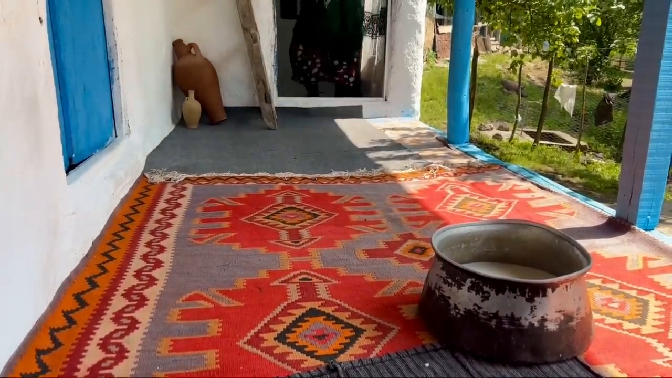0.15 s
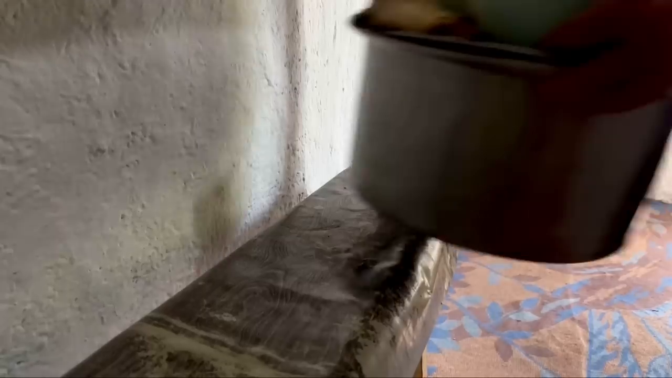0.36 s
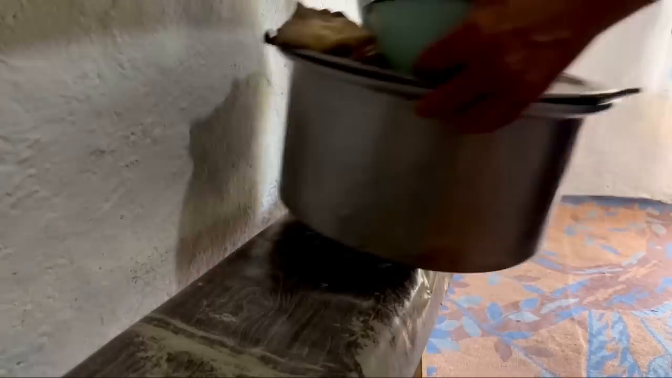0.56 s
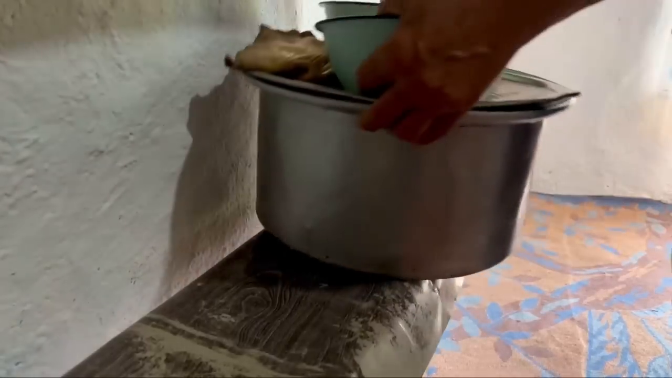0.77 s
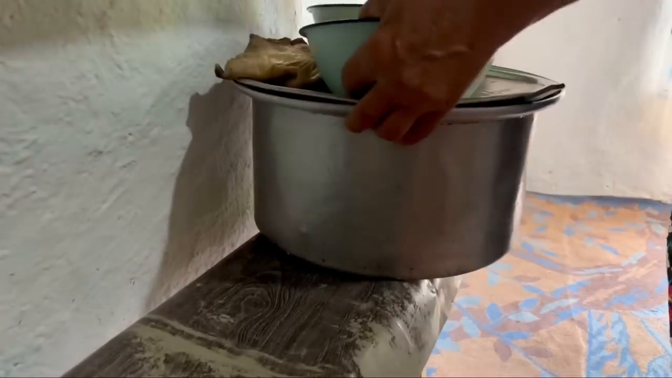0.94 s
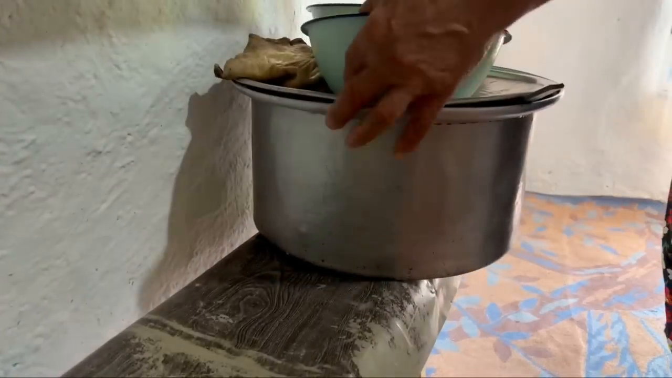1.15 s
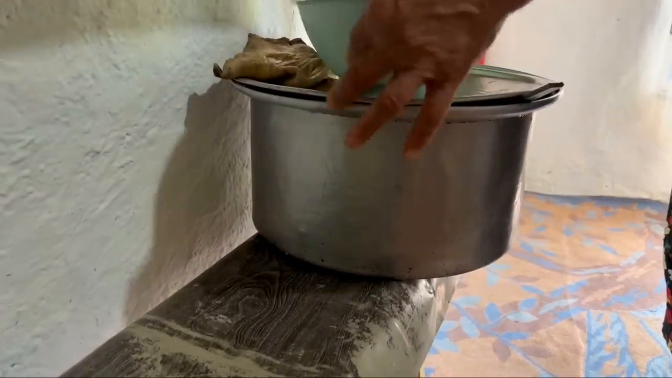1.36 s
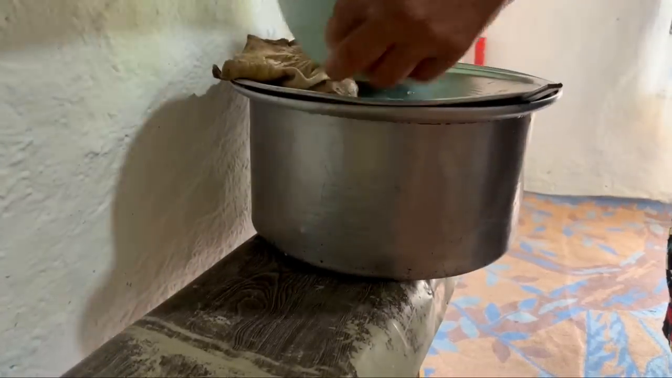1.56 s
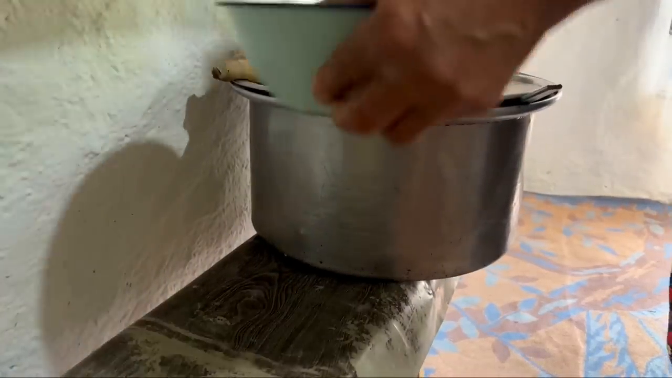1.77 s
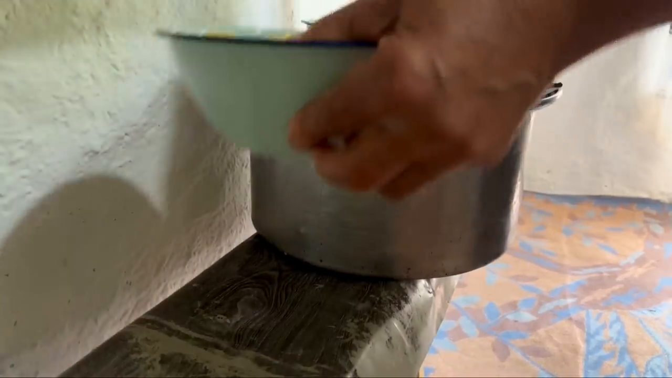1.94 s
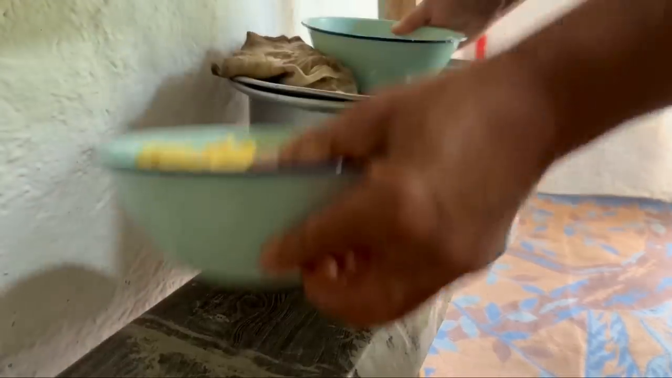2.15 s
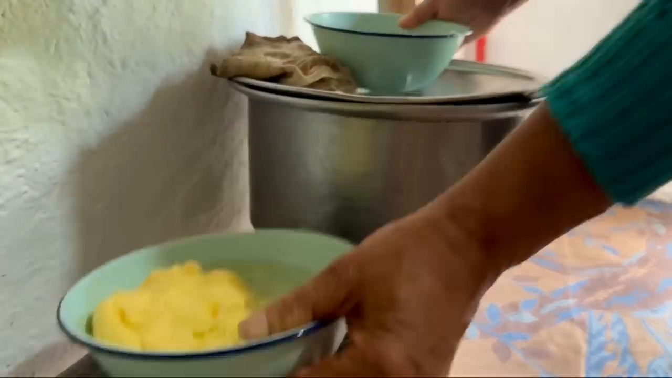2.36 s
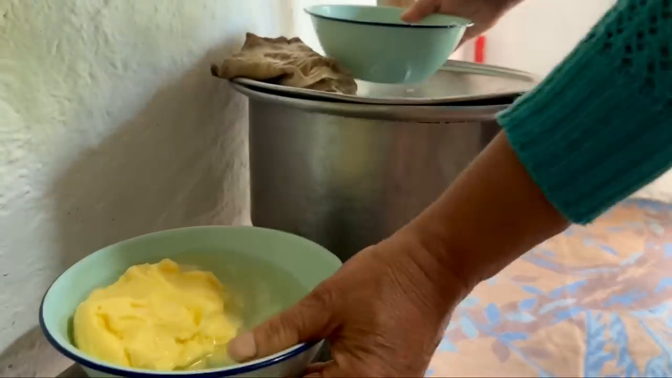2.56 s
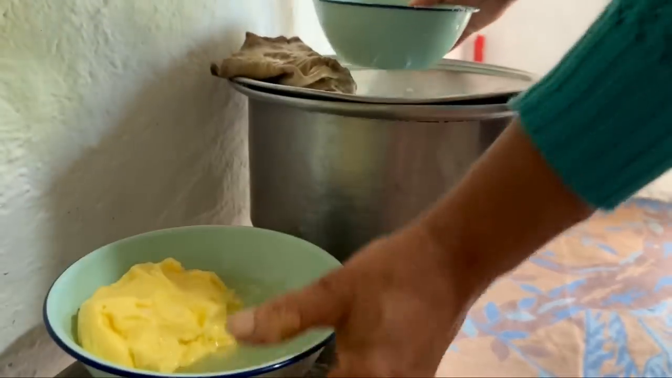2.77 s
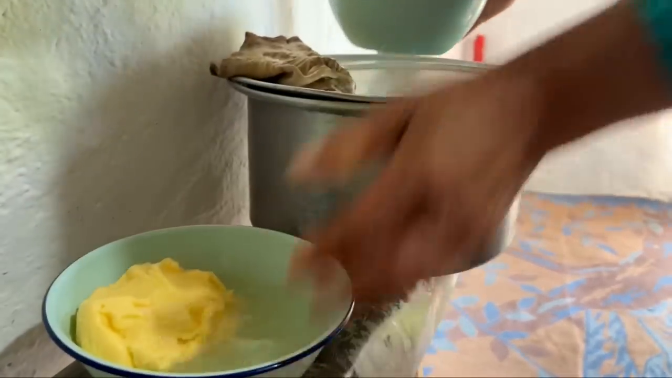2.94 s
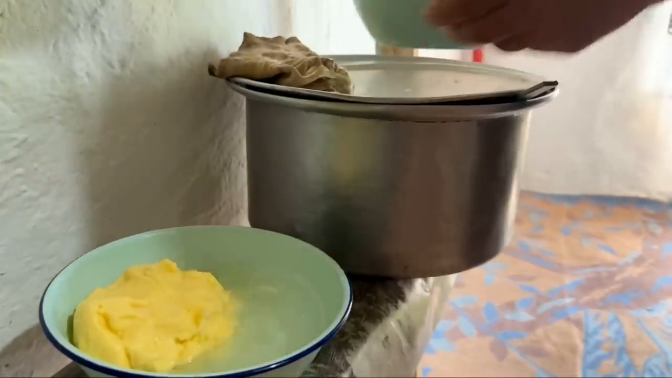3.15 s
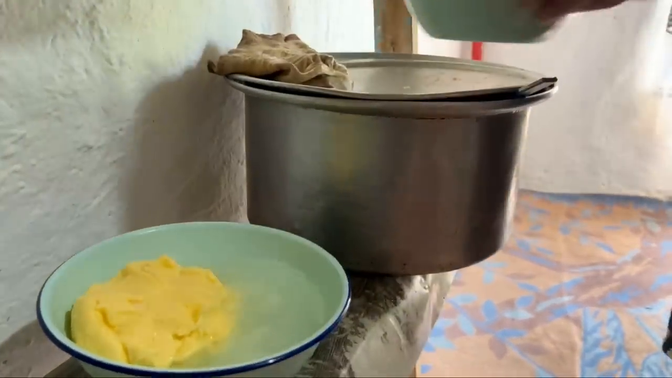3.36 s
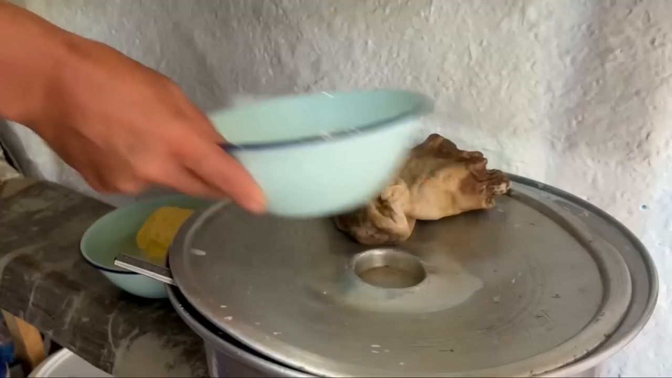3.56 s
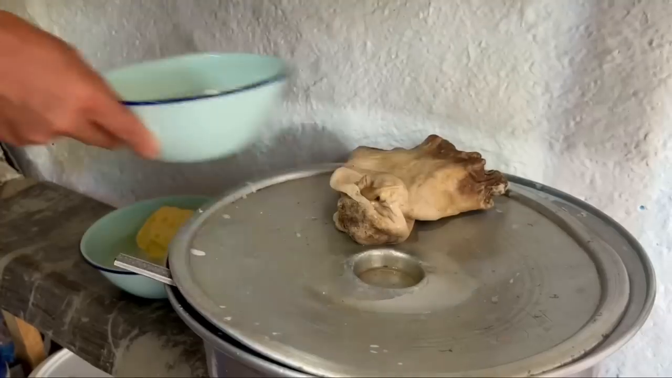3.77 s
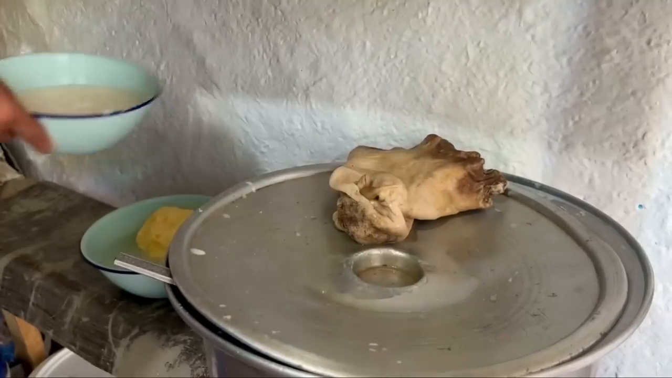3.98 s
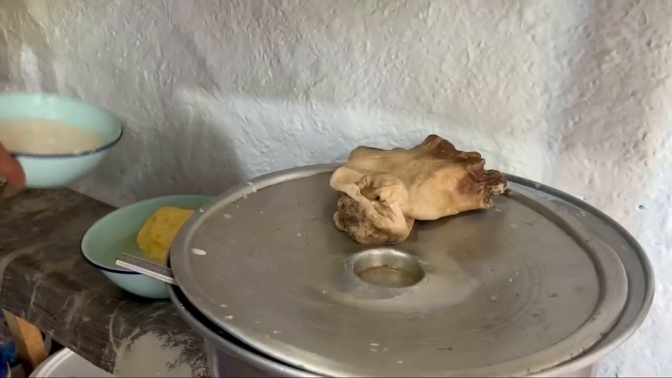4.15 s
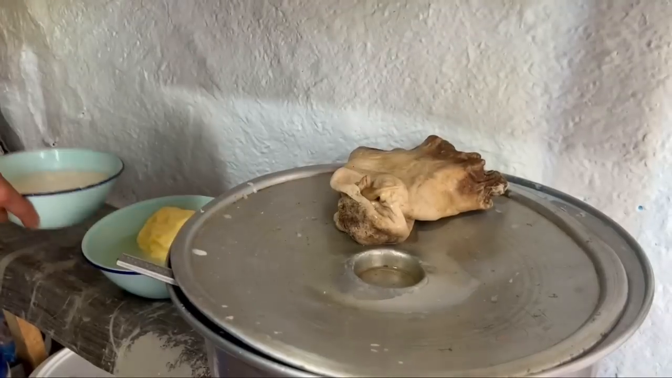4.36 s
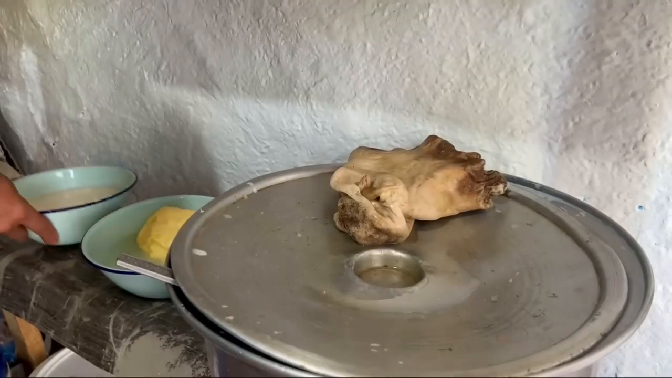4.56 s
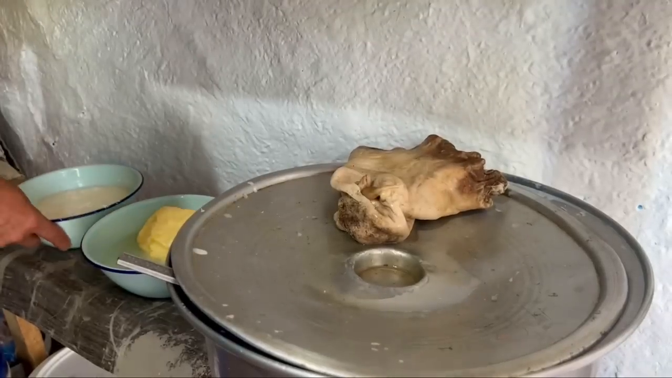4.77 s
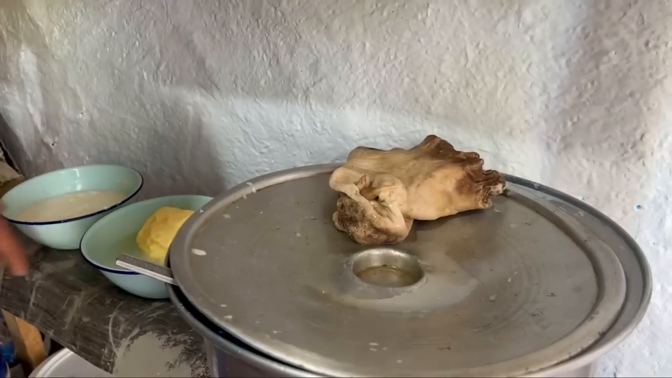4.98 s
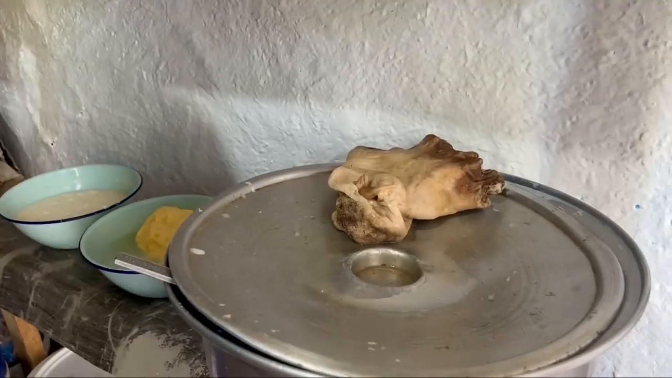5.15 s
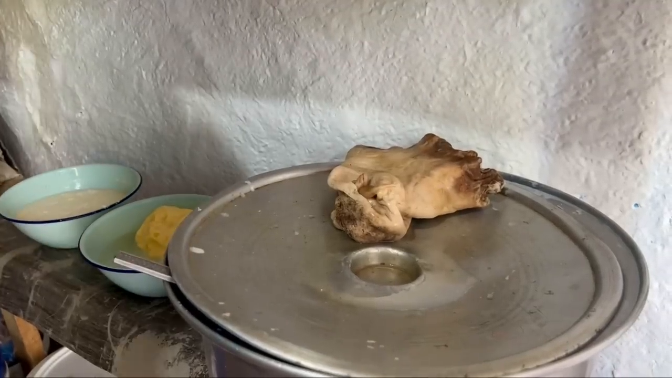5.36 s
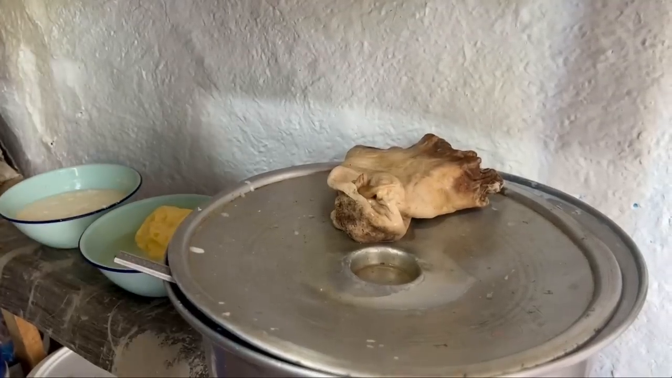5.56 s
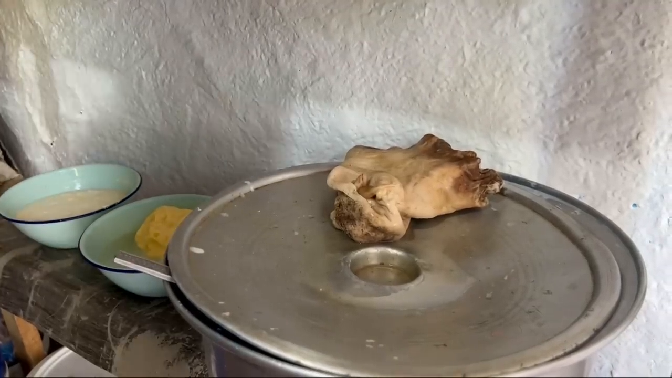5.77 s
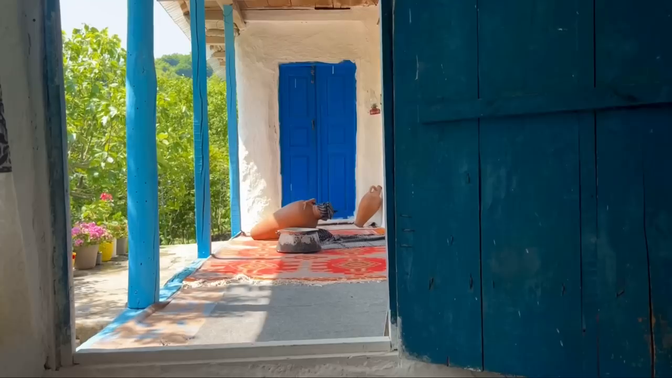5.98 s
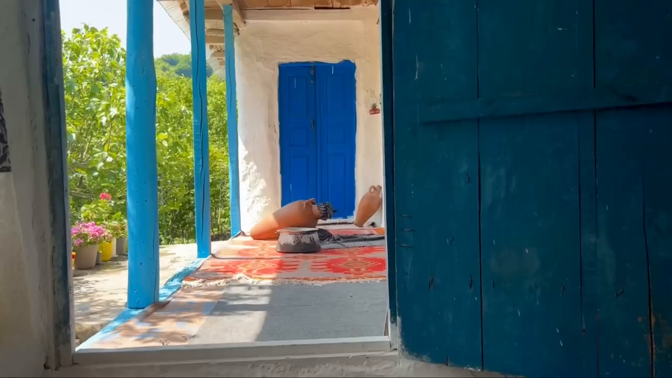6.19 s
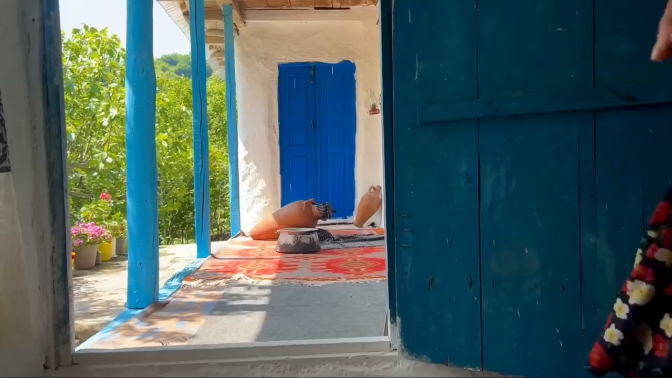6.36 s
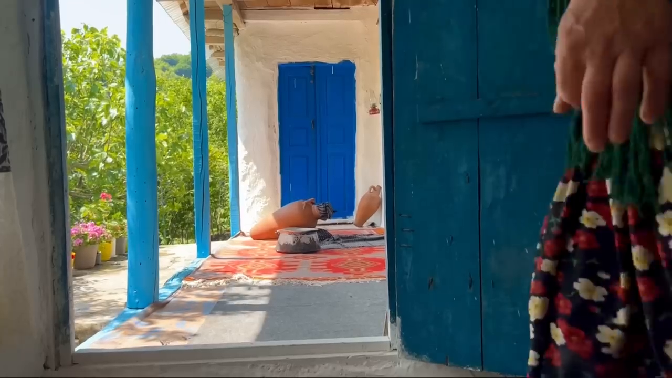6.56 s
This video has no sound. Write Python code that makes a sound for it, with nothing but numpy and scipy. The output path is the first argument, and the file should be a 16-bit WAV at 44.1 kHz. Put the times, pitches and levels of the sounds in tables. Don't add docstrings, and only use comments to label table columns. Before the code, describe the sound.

In a small plastered room, a pot thumps down, enamel clatters loudly on a metal lid, bowls are set on wood, and a low floor hum follows.

```python
import sys
import numpy as np
from scipy import signal
from scipy.fft import rfft, irfft, next_fast_len
from scipy.io import wavfile
from scipy.ndimage import uniform_filter1d

SR = 44100
rng = np.random.default_rng(int(sys.argv[2]) if len(sys.argv) > 2 else 0)


def volts_from_db(level):
    exponent = np.asarray(level, float) / 20
    return 10 ** exponent


def digitize_waveform(pressure):
    field = np.atleast_2d(pressure).T
    bounded = np.clip(field, -1, 1)
    quanta = np.round(bounded * 32767).astype(np.int16)
    wavfile.write(sys.argv[1], SR, quanta)


N = 291936


def unit(x):
    return x / np.sqrt(np.mean(x ** 2, axis=-1, keepdims=True) + 1e-30)


def band(x, lo, hi):
    return signal.sosfilt(signal.butter(3, [lo, hi], "band", fs=SR, output="sos"), x)


def walk(rate):
    k = int(SR / rate)
    steps = np.repeat(rng.standard_normal(N // k + 1), k)
    return unit(uniform_filter1d(uniform_filter1d(steps, k), k)[:N])


def pair(size, alike):
    mid, side = rng.standard_normal((2, size))
    alike = np.clip(alike, 0, 1)
    return np.sqrt((1 + alike) / 2) * mid + np.sqrt((1 - alike) / 2) * side * np.array([[1], [-1]])


# (time [s], knock peak [dB], thud over knock [dB], rattle over knock [dB])
POT_HITS = [(0.71, -41, -2, 4.5), (0.748, -47.5, 7, -20), (0.799, -41, -2.5, -18), (0.845, -24, 9, -8.5),
            (0.883, -32.5, 2.5, -11.5), (1.016, -44, -9, -7), (1.03, -53, -6.5, 4), (1.043, -48, 1, -2.5),
            (1.058, -52, -1.5, -4), (1.084, -52, -0.5, -19.5), (1.108, -49.5, 2.5, -27),
            (1.152, -55, 4.5, -19.5)]
CLINK_HITS = [
    (1.353, -11, -8, -2),
    (1.363, -20, 3.5, -8.5),
]
LID_HITS = [
    (1.69, -12, 3, 0),
    (1.753, -20.5, 0.5, -17),
    (1.704, -15, 2.5, -5.5),
    (1.72, -16, 1.5, -8),
    (1.78, -29.5, 0.5, -6),
    (1.812, -28, -1, -14),
    (1.999, -57.5, -16.5, -30),
]
BOWL_HITS = [
    (2.386, -37.5, -6, -8.5),
    (2.397, -13, 3, -21.5),
    (2.410, -33, 10.5, 0),
    (2.424, -27, -20, -4),
    (2.441, -35, 14, 6),
    (2.462, -33, 6, -9),
]
ROCK_HITS = [
    (2.625, -49.5, 5, -2),
    (2.635, -40, 21, -10),
    (2.645, -33, 2, -1.5),
    (2.667, -35, 5.5, -5),
]
TICK_HITS = [
    (3.223, -55, -9, 7.7),
    (3.276, -58.5, 7, 11.8),
    (3.421, -37, -21, 7.5),
]
LAST_HITS = [
    (4.575, -62, -8, -14),
    (4.612, -26, 6.5, -16),
    (4.619, -24.5, 9, -3),
    (4.742, -54, 17, -8),
    (4.80, -63, 16, -6),
]
SCUFFS = [(0.257, -65, 1, -13), (0.453, -63, -4, 6), (2.929, -61.5, -16, -13.5), (3.267, -54, -20, -1.5),
          (3.319, -63, 3.5, -17), (3.513, -55, -4.5, -11.5), (4.934, -59, -2, -18.5), (5.049, -66, 5, -9)]
TOUCH_HITS = [(1.24, -62, 17.5, 2.5), (1.264, -60, -2.5, -5.5), (1.281, -45, -26.5, -6),
              (1.299, -50, -7, 1), (1.577, -60, 5.5, 9.5)]
SLIDE_HITS = [(4.308, -52.5, -14, 5), (4.322, -42, -11.5, -12.5), (4.35, -47.5, -3, -22),
              (4.43, -52, -1.5, -15.5)]
STEP_HITS = [(2.267, -54, -5, -12), (3.024, -55, -5, -12.5), (3.677, -54, -3, -15), (5.804, -58, -6, -12)]
SNAP_HITS = [(2.767, -39.5, -12, 2.9), (2.772, -40, 1.5, 1.1), (2.795, -47, -11, 1.5),
             (2.802, -48, -6, 5.2)]
# (frequency [Hz], level [dB], t60 [s])
STEP = [(125, 5, .12), (261.3, 2, 0.052), (415.3, -7.5, 0.075), (910.5, -16, .004), (1900, -22, 0.0069),
        (4200, -14.5, .005)]
TOUCH = [(290, -0.5, .08), (680, 2, 0.098), (1521, -7.5, 0.054), (5030, -12, .005), (5502, -13.5, 0.0045),
         (7900, -14.5, 0.012)]
SLIDE = [(202, -4, 0.17), (289.6, 8, 0.08), (396, -7, 0.12), (670, -18.5, 0.065), (4734, -37.5, .03)]
POT = [(120.7, -11.5, 0.24), (150.3, -9, 0.35), (195.2, -7, 0.19), (260.7, 1, 0.06), (332.6, -10.5, 0.064),
       (448, -18, 0.036), (670, -15, 0.096), (1218, -31.5, 0.052), (1510, -29, .06), (2230, -54, 0.071),
       (4425, -33, 0.033), (4858, -26, .05)]
CLINK = [(113.07, -8, 0.1), (181, 0, 0.083), (336, -10, 0.036), (423, -2, 0.097), (520, 0, .06),
         (683, -3.5, 0.077), (798, -6, 0.17), (1044, -8, 0.056), (1460, -4, 0.035), (1930, -10.5, 0.026),
         (2410, -10.5, 0.043), (4900, -17, 0.012), (5250, -4.5, .015), (5637, -10.5, .015),
         (7700, -10.5, 0.0099), (8490, -9.5, .012)]
LID = [(111, -9, 0.22), (181, 3, 0.12), (258, -1.5, 0.066), (344, 0, 0.048), (426, -1, 0.12),
       (502, -11.5, 0.2), (687, -14.5, 0.3), (803.2, -11, 0.19), (1090, -13, 0.038), (1510, -16, .12),
       (2100, -23, .03), (2400, -23.5, 0.02), (3380, -25.5, 0.0091), (5500, -27, 0.0096),
       (7350, -23.5, .012)]
BOWL = [(85.7, -5, .25), (196.4, -1.5, 0.088), (243, -12.5, 0.063), (306, -1.5, 0.091),
        (407.4, -1.5, 0.054), (453, 7, 0.0084), (631, -12, 0.039), (808, -14, 0.071), (988, -11.5, 0.023),
        (1230, -8, 0.044), (1490, -15, 0.025), (1950, -16, 0.03), (6800, -36, 0.0061)]
ROCK = [(101, -11, .2), (220.5, -1, 0.059), (277, 5.5, 0.028), (337, 0.5, 0.024), (438, 0.5, 0.045),
        (577, 0, 0.013), (688, -2.5, 0.043), (1065, 1, 0.04), (1380, -26, .04), (2440, -12.5, 0.025),
        (3990, -22, 0.006), (5800, -22, 0.006)]
TICK = [(246, -13, 0.041), (400, -13, 0.03), (1763, -3.5, 0.012), (2747, -16, 0.0062), (4990, -3.5, 0.0055),
        (6360, -10, 0.0035), (7760, -2.5, 0.0027)]
LAST = [(118, -38.5, 0.18), (181.4, -6, 0.2), (238.2, -2.5, 0.15), (360, 8, 0.034), (474, -7, 0.07),
        (700, 2, 0.042), (1000, -40, 0.032), (1550, -9.5, 0.0056), (2670, -28, 0.011), (4800, -38, 0.0045)]
FLOOR_BOARD = [(119, 1.5, 0.26), (269, 4, 0.2), (396, -32, 0.042), (907, -10.5, 0.007), (4100, -19, 0.036)]
SNAP = [(240.5, -3.5, 0.022), (424, -12, 0.042), (2270, 8.5, 0.0045), (3360, 3.5, 0.0018),
        (4260, -10, 0.0037)]
# (contacts, modes, push [s], rattle t60 [s], ring over rattle [dB], rattle tilt [dB/octave],
# sizzle over rattle [dB], left minus right [dB])
OBJECTS = [(POT_HITS, POT, 0.0028, 0.09, -8, -6, -8.5, .3),
           (CLINK_HITS, CLINK, 0.0007, 0.12, 3.6, -7.5, 5, .3),
           (LID_HITS, LID, 0.00037, 0.11, -7.5, -4.5, -2.5, .3),
           (BOWL_HITS, BOWL, 0.0016, 0.065, -7, -10.5, -9, 0.94),
           (ROCK_HITS, ROCK, 0.00165, 0.08, -3, -2.5, -8.5, .3),
           (TICK_HITS, TICK, 0.00041, 0.01, -1, -0.82, -22, 1.1),
           (LAST_HITS, LAST, 0.0018, 0.11, -1.1, -9.5, -4, -1.6),
           (SCUFFS, FLOOR_BOARD, 0.0049, 0.26, -27, -2, -2, 0.34),
           (TOUCH_HITS, TOUCH, 0.0064, 0.03, -1.5, -1.8, -18, -.3),
           (SLIDE_HITS, SLIDE, 0.00843, 0.18, -6.5, -7, -9, -.3),
           (SNAP_HITS, SNAP, 0.00036, 0.013, 9.5, -2.2, -22, 0.87),
           (STEP_HITS, STEP, 0.0012, 0.27, -15.5, -7, -11, 0.25)]
# (level sent to the room [dB], floor bump over thud [dB])
PLACES = [(-1, -14), (-6.5, -30), (-2, -19.5), (0, -12.5), (-2, -10.5), (-6, -31), (-2.5, -20), (1, -18.5),
          (1.5, -18.5), (1, -15), (-7, -19), (0.5, -16.5)]
# (low edge [Hz], high edge [Hz])
BANDS = [(60, 500), (500, 3000), (3000, 9800), (9800, 15700)]


def contacts(hits, modes, push_s, rattle_s, ring_db, tilt_db, sizzle_db, pan_db, bump_db):
    size = 10800
    lead_in = 24
    bump_rise_s, bump_t60_s = 0.02, 0.25
    t = np.arange(size) / SR
    hz, db, t60 = np.transpose(modes)[:, :, None]
    t60 = np.minimum(t60, np.minimum(0.17, 0.08 * (1500 / hz) ** 1.4))
    rings = volts_from_db(db) * np.sin(2 * np.pi * hz * t) * 1000 ** (-t / t60)
    s, knock_db, weight_db, edge_db = np.transpose(hits)[:, :, None]
    hiss, jolts, rest = np.moveaxis(rng.standard_normal((len(hits), 3, size)), 1, 0)

    strength = volts_from_db(2.0 * rest[:, :len(modes)]) * np.sign(rest[:, -len(modes):])
    ring = strength @ rings
    grain = volts_from_db(3.0 * np.repeat(rest[:, 100:400], 64, axis=1)[:, :size])
    fall = grain * 1000 ** (-t / rattle_s) * (1 - np.exp(-t / (0.96 * push_s)))
    tilt = volts_from_db(tilt_db * np.log2(np.arange(size // 2 + 1) + 100.))
    rattle = irfft(rfft(hiss) * tilt, size) * fall
    chatter = signal.fftconvolve(ring, jolts * fall ** 4, axes=1)[:, :size]
    pushed = signal.lfilter(np.hanning(int(push_s * SR) + 3), 1, ring)
    bump = band(jolts * (1 - np.exp(-t / bump_rise_s)) * 1000 ** (-t / bump_t60_s), 32, 80)

    thud = volts_from_db(bump_db) * unit(bump) + unit(band(pushed, 110, 680))
    thud = thud + volts_from_db(-8.0) * unit(band(rattle, 100, 500))
    knock, edge = [volts_from_db(ring_db) * unit(band(chatter, *b)) + unit(band(rattle, *b)) for b in BANDS[1:3]]
    sizzle = band(rattle * fall, *BANDS[3])
    sound = 0
    for over_db, part in ((weight_db, thud), (0, knock), (edge_db, edge), (edge_db + sizzle_db, sizzle)):
        sound = sound + volts_from_db(knock_db + over_db) * part / np.abs(part).max(axis=1, keepdims=True)

    beside = early(rest[:, 1024:3584].reshape(len(hits), 2, 1280))
    sound = sound[:, None] + signal.fftconvolve(sound[:, None], beside, axes=2)[:, :, :size]
    pan = volts_from_db(np.array([[pan_db], [-pan_db]]) / 2)
    out = np.zeros((2, N + SR))
    for i, one in zip((s[:, 0] * SR).astype(int) - lead_in, sound):
        heard = t + i / SR < CUTS[np.searchsorted(CUTS, i / SR)]
        out[:, i:i + size] += heard * one * pan
    return out[:, :N]


def early(noise):
    t = np.arange(noise.shape[-1]) / SR
    t60_s = 0.039
    returns = noise * 1000 ** (-t / t60_s) * (t > 0.0008)
    return volts_from_db(-5.5) * unit(band(returns, 586, 8900)) / np.sqrt(len(t))


# (time [s], frequency [Hz], level [dB], rise [s],
# t60 [s])
ENAMEL = [(.711, 284, -32, .004, 0.081), (.749, 278, -40, .003, 0.064), (.802, 296, -35, 0.0026, .06),
          (.848, 256, -17.5, .003, 0.17), (.855, 711, -33, .004, 0.11), (1.356, 439, -21, .003, 0.19),
          (1.357, 534, -20, 0.004, .17), (1.354, 5250, -26, 0.00059, 0.027),
          (1.691, 437, -10.5, .001, 0.09), (1.691, 1180, -19.5, .001, 0.039),
          (1.754, 800, -27.5, .002, .05), (2.398, 1130, -18, 0.00099, .03), (2.44, 667, -30, 0.0039, 0.12),
          (2.636, 666, -34, 0.0021, .06), (2.637, 225, -24, 0.0041, .1), (3.4218, 4900, -45, 0.0004, 0.011),
          (.852, 205, -19, .01, .16), (.87, 150, -25, .02, 0.3), (1.272, 690, -41, .012, 0.2),
          (1.355, 1450, -24, .001, 0.054), (1.357, 1477, -56, .001, 0.41), (1.356, 680, -18.5, .003, 0.15),
          (1.357, 810, -19.5, .003, 0.12), (1.362, 181, -21.5, .015, 0.16), (1.691, 1470, -41, .001, 0.66),
          (1.694, 2392, -28, .004, .15), (1.692, 2780, -48, .001, .3), (1.694, 183, -7.5, .008, 0.16),
          (1.77, 183, -22.5, .012, 0.14), (2.398, 666, -23, .003, 0.056), (2.41, 90, -20, .012, .1),
          (2.41, 183, -20, .01, 0.22), (4.612, 695, -30, .003, 0.1), (4.635, 172.4, -25, .015, 0.28),
          (4.742, 184, -35.5, .01, .15),
          (.85, 113, -27, .015, .3), (.852, 560, -33, .005, .2), (.852, 1174, -38, .003, .15),
              (.85, 1325, -38, .002, .12), (.905, 200, -26, .004, .1), (1.356, 1001, -31, .002, .13),
              (1.357, 1051, -31, .003, .15), (1.358, 1130, -35, .003, .15), (1.356, 7900, -28, .001, .03),
              (1.694, 117, -25, .02, .35), (1.694, 256, -15, .005, .2), (1.695, 530, -22, .004, .2),
              (1.696, 805, -25, .005, .3), (1.694, 1240, -23, .002, .09), (1.696, 1126, -30, .004, .3),
              (1.694, 1570, -26, .002, .15), (1.70, 2800, -29, .006, .13), (1.692, 4400, -24, .0008, .015),
              (1.692, 5600, -24, .0008, .015), (1.753, 330, -19, .003, .07), (2.399, 295, -16, .002, .12),
              (2.40, 389, -24, .004, .25), (2.399, 800, -27, .002, .12), (2.40, 985, -30, .004, .2),
              (2.398, 1450, -26, .001, .05), (2.424, 1700, -31, .001, .03), (2.646, 1061, -42, .004, .2),
              (2.637, 340, -29, .002, .1), (2.638, 480, -33, .003, .1), (1.6915, 300, -13, .001, .04),
              (2.646, 1210, -43, .004, .15), (2.646, 2050, -46, .003, .1), (4.613, 330, -24, .003, .04),
              (4.62, 2650, -38, .001, .04)]


def enamel():
    lag_spread_s = 0.0004
    since = np.arange(int(0.4 * SR)) / SR
    out = np.zeros((2, N + SR))
    rows = ENAMEL
    flutter = volts_from_db(2.5 * walk(70))
    lags = lag_spread_s * rng.standard_normal(len(rows))
    for (s, hz, db, rise_s, t60), lag in zip(rows, lags):
        turn = 2 * np.pi * hz * (since + np.array([[lag], [-lag]]) / 2)
        shake = np.roll(flutter, int(hz * 37))[:len(since)]
        swell = (1 - np.exp(-since / rise_s)) * 1000 ** (-since / t60)
        start = int(s * SR)
        out[:, start:start + len(since)] += volts_from_db(db) * shake * np.sin(turn) * swell
    return out[:, :N]


# (middle [s], spread [s], level [dB])
DRAG = [
    [(5.07, 0.044, -54), (5.45, 0.17, -56), (5.8, 0.041, -57)],
    [(4.97, 0.064, -56), (5.5, 0.34, -59)],
    [(5.02, 0.054, -60), (5.4, 0.36, -68)],
    [(5.1, 0.27, -64.5)],
]
# (frequency [Hz], width [Hz])
DRAG_MODES = [(57, 10), (122, 10), (385, 14), (400, 500)]


def drag():
    t = np.arange(N) / SR
    out = 0
    for (hz, width), swells in zip(DRAG_MODES, DRAG):
        hum = unit(band(pair(N, 0.76), hz - width / 2, hz + width / 2))
        out = out + hum * sum(volts_from_db(db) * np.exp(-((t - s) / spread) ** 2) for s, spread, db in swells)
    return (t < CUTS[3]) * out


# (frequency [Hz], density [dB/Hz])
AIR_COLOUR = [(13, -47), (22, -22.5), (35, -14), (59, 3), (87, -7.5), (165, -15), (236, -13), (387, -11.5),
              (420, -18), (815, -32), (1670, -30.5), (6810, -37.5), (10000, -48.5), (11800, -45),
              (16000, -58)]
# (time [s], rumble [dB], cloth under rumble [dB], t60 [s])
SHIFTS = [(0.0, -52, -28, .7), (0.86, -50, -23, 2.5), (1.4, -58, -14, 3.5), (1.76, -56, -11, 1.6),
          (2.5, -50, -22, 1.5), (2.76, -53, -28, .6), (3.02, -68, -7, 1.), (3.24, -68, -6, 1.2),
          (3.45, -70, -6, 1.5), (3.68, -62, -20, 1.8), (4.34, -67, -13, 2.5), (4.76, -55, -30, 3.5),
          (5.05, -62, -15, 2.5), (5.4, -61, -30, 3.5)]
# (rumble [dB], room hum [dB])
STILL_LOW = [(-62.5, -68), (-70, -75), (-69, -76.5), (-72.5, -72.5)]
# (air [dB], outdoor hiss [dB])
STILL_AIR = [(-72.5, -73.5), (-80.5, -87), (-81, -84.5), (-76, -76.5)]


def air():
    rise_s = 0.02
    groups = [0, 0, 0, 0]
    colour_hz, colour_db = np.transpose(AIR_COLOUR)
    for hz in 36 * 2 ** np.arange(0, 8.6, 0.5):
        db = np.interp(np.log(hz), np.log(colour_hz), colour_db) + 0.5 * walk(37)
        half_octave = signal.butter(2, [hz / 1.19, hz * 1.19], "band", fs=SR, output="sos")
        noise = signal.sosfilt(half_octave, pair(N, 1.05 - hz / 1500))
        groups[np.searchsorted([150, 700, 3000], hz)] += volts_from_db(db) * noise
    t = np.arange(N) / SR
    shot = np.searchsorted(CUTS, t, side="right") - 1
    stir = np.zeros((4, N))
    for s, db, cloth_db, t60 in SHIFTS:
        same_shot = shot == np.searchsorted(CUTS, s, side="right") - 1
        since = np.maximum(t - s, 0) * same_shot
        swell = (1 - np.exp(-since / rise_s)) * np.exp(-np.log(1000) * since / t60)
        levels = volts_from_db(db + np.array([[0], [-6.5], [cloth_db], [cloth_db - 5]]))
        stir += levels ** 2 * swell ** 2
    still = volts_from_db(np.hstack([STILL_LOW, STILL_AIR]))[shot].T
    total = sum(unit(g) * np.sqrt(q ** 2 + power) for g, q, power in zip(groups, still, stir))
    return volts_from_db(np.array([[0.6], [-0.6]])) * total


# (frequency [Hz], t60 [s], reverberant level [dB], left-right likeness [0-1])
ROOM = [(59, 0.16, -2.5, 0.8), (126.5, .28, 0.5, .85), (271, 0.25, -3, 0.7), (532, 0.21, -1, 0.2),
        (1190, 0.32, -4.5, 0.2), (1940, 0.25, -6, .3), (4320, 0.22, -6, .4), (7378, 0.21, -6.5, 0.7),
        (13000, 0.26, -12, .8)]
# (frequency [Hz], level [dB], rise [s], t60 [s])
STANDING = [(117, -7.5, .02, 0.22), (183, -6, .015, 0.14), (258.24, -14.5, .008, .08)]
# (frequency [Hz], left minus right [dB])
PORT_BALANCE = [(60, 1.5), (110, 1.5), (200, 5), (380, 2), (700, -0.06), (1290, 4.5), (2380, 3.5),
                (4400, 8), (8120, 5.5), (15000, -0.78)]
# (frequency [Hz], left lead [rad])
PORTS = [(100, 0.5), (600, 0.47), (1500, 0.85), (3600, 1.68), (5800, 0.5), (6600, 1.02), (8000, 0.7),
         (10000, 1.57), (12500, -0.7), (16000, -2)]


def room():
    t = np.arange(SR // 2) / SR
    out = np.zeros((2, len(t)))
    for hz, t60, db, alike in ROOM:
        noise = band(pair(len(t), alike), hz / 1.5, min(hz * 1.5, 19000))
        echoes = noise * 1000 ** (-t / t60) * (1 - np.exp(-t / 0.002))
        out += volts_from_db(db) * echoes * np.sqrt(np.log(1000) * 2 / (t60 * SR))
    for hz, db, rise_s, t60 in STANDING:
        wave = np.sin(2 * np.pi * hz * t) * (1 - np.exp(-t / rise_s)) * 1000 ** (-t / t60)
        out += volts_from_db(db) * unit(wave) * np.sqrt(hz / SR / len(t))
    log_f = np.log(np.arange(1, 258) * SR / 512)
    balance_hz, balance_db = np.transpose(PORT_BALANCE)
    louder = volts_from_db(np.interp(log_f, np.log(balance_hz), balance_db) * np.array([[0.5], [-0.5]]))
    port_filter = np.roll(irfft(louder), 128, axis=1)
    out = signal.fftconvolve(out, port_filter, axes=1)[:, 128:128 + len(t)]
    lead_hz, lead_rad = np.transpose(PORTS)
    lead = np.interp(log_f, np.log(lead_hz), lead_rad)
    direct = np.roll(irfft(louder * np.exp(0.5j * np.array([lead, -lead]))), 24, axis=1)
    return direct, out


CUTS = [0, .243, 3.55, 5.88, 6.7]


def scene():
    direct, echoes = room()
    out = air() + drag()
    dry = [contacts(*o, bump_db) for o, (_, bump_db) in zip(OBJECTS, PLACES)]
    rings = enamel()
    wet = sum(volts_from_db(room_db) * d for d, (room_db, _) in zip(dry, PLACES))
    wet = wet + volts_from_db(-10) * rings
    out += signal.oaconvolve(sum(dry) + rings, direct, axes=1)[:, :N]
    for a, b in zip(CUTS, CUTS[1:]):
        shot = slice(int(a * SR), min(int(b * SR), N))
        t = np.arange(shot.start, shot.stop) / SR
        out[:, shot] += signal.fftconvolve(wet[:, shot], echoes, axes=1)[:, :len(t)]
        fade_in = (t - a) / 0.015 + (a == 0)
        fade_out = (b - t) / 0.0066
        out[:, shot] *= np.clip(np.minimum(fade_in, fade_out), 0, 1)
    return out


def top_cut(x):
    return signal.sosfilt(signal.butter(12, 16970, fs=SR, output="sos"), x)


# (frequency [Hz], width [Hz], depth [dB])
MIC_DIPS = [(10320, 830, -26.5), (13730, 930, -29), (16900, 400, -21.5)]


def record(dry):
    headroom, knee = 1.05, 6
    size = next_fast_len(N)
    f = np.arange(size // 2 + 1) * SR / size
    db = 0
    for hz, width, depth_db in MIC_DIPS:
        off = (f - hz) / width
        db = db + depth_db * np.exp(-off ** 2 - off ** 6)
    bass_loss = 1 + (36 / (f + 1)) ** 4
    heard = irfft(rfft(dry, size) * volts_from_db(db) / bass_loss, size)[:, :N]
    mix = heard / (1 + (np.abs(heard) / headroom) ** knee) ** (1 / knee)
    return top_cut(mix)


dry = scene()
out = record(dry)
digitize_waveform(out)
```